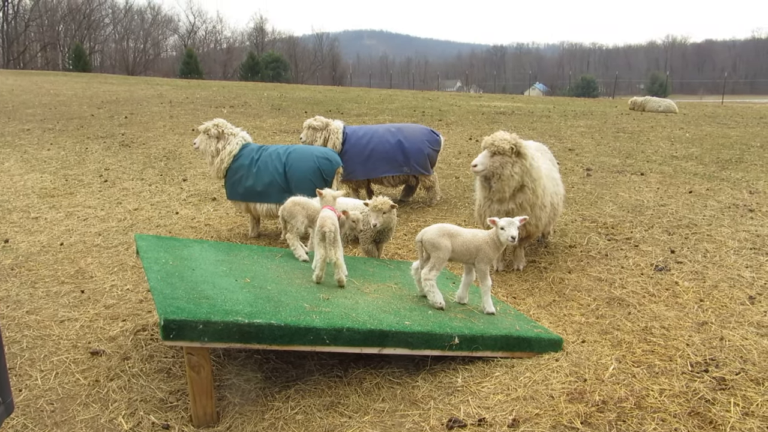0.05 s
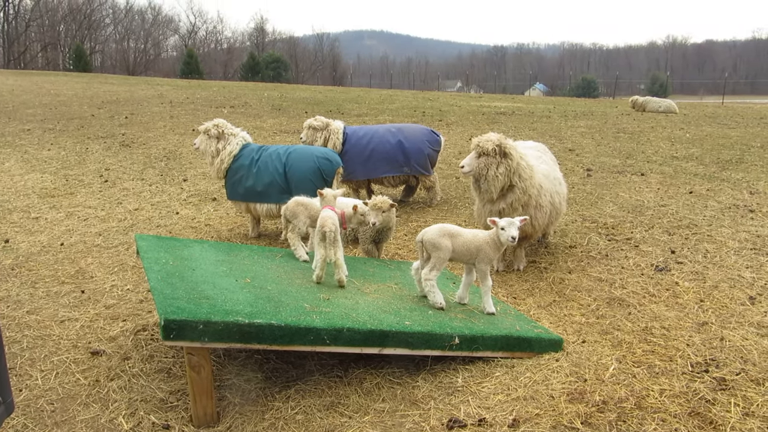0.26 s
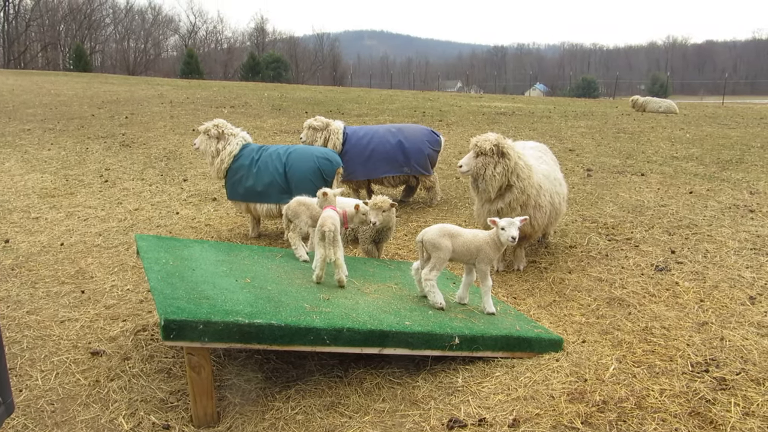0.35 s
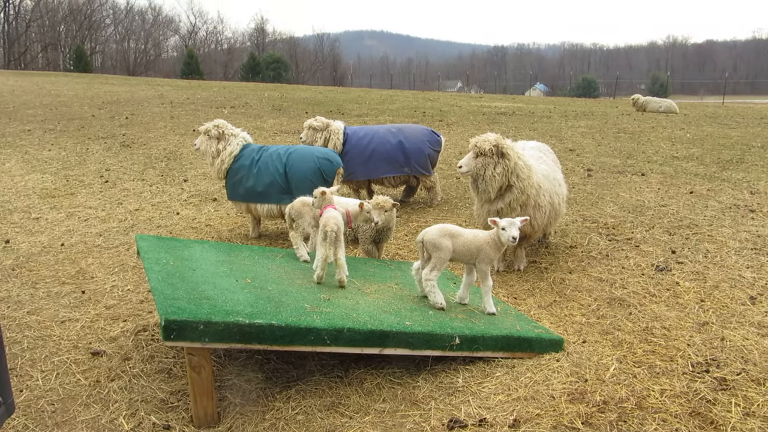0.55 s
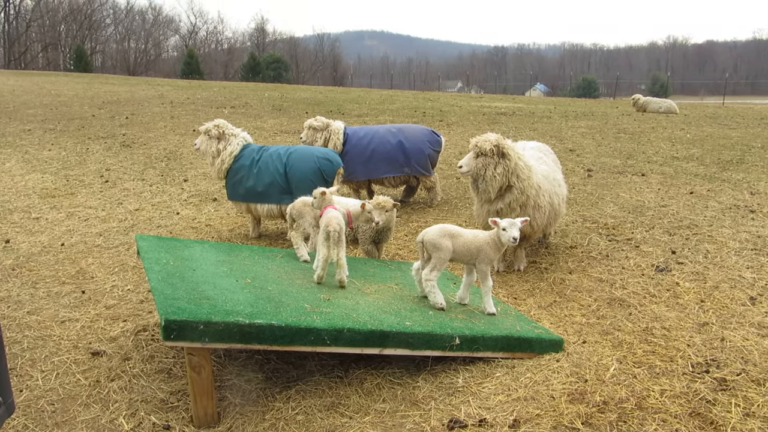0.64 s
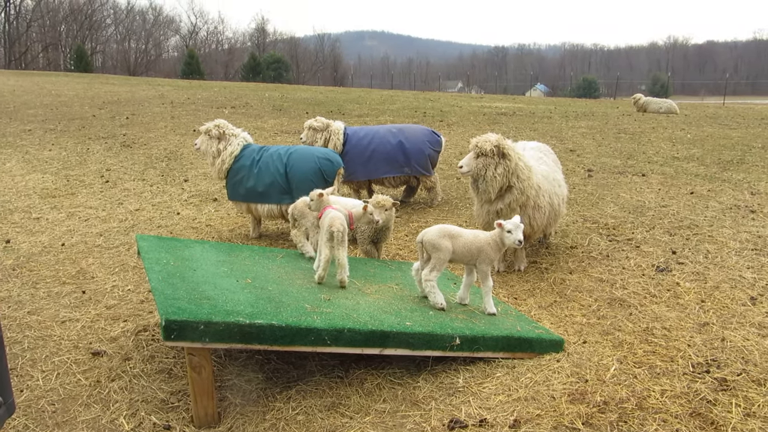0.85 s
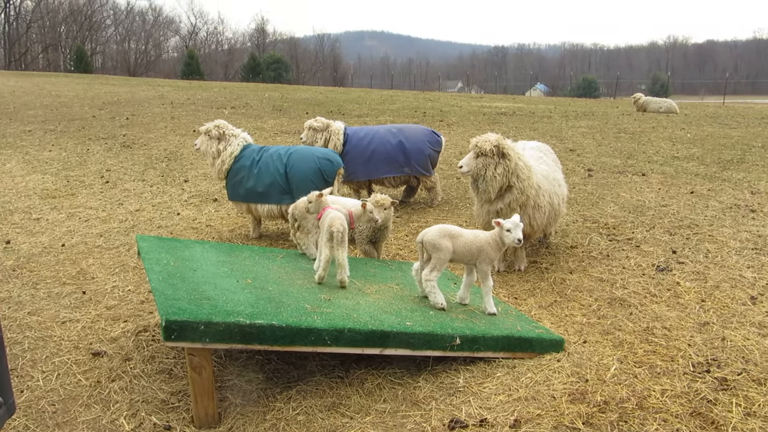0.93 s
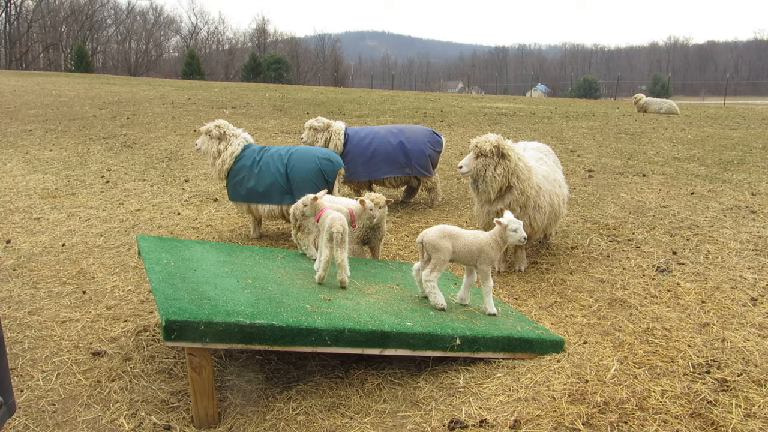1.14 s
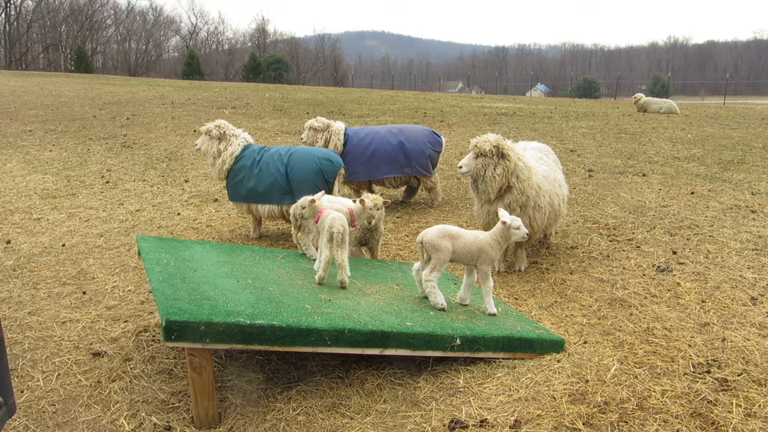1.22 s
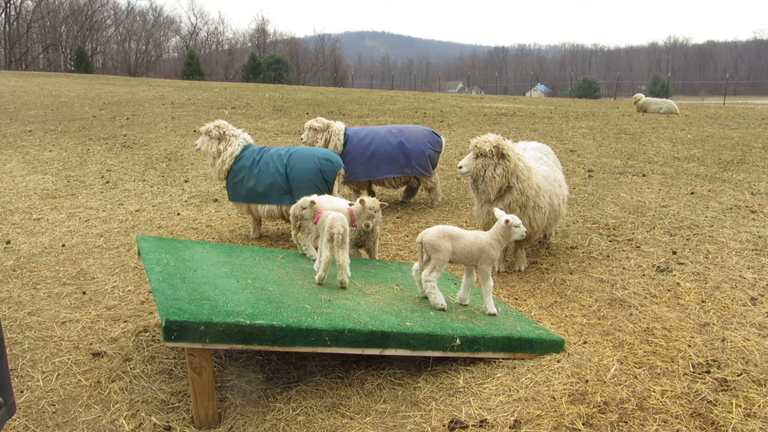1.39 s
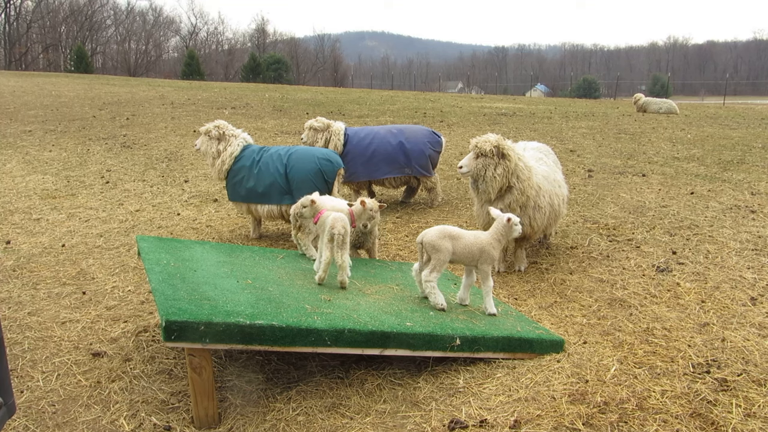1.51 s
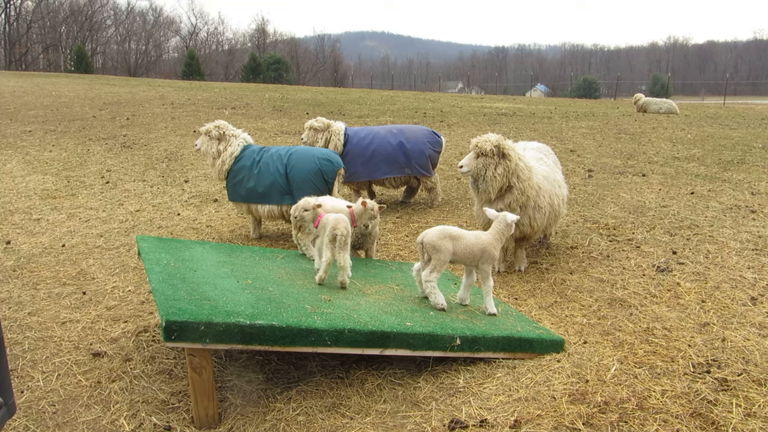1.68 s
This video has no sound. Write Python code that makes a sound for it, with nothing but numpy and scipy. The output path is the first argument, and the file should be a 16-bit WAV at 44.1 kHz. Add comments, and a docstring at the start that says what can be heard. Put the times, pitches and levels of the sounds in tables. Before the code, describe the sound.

One loud, steady, reedy lamb bleat, close to the microphone and toward the left, with a faint echo from across an open field; soft hoof taps and straw scuffs follow over low outdoor hiss.

```python
"""Open field: a lamb close by gives one loud bleat; hooves knock on a carpeted wooden ramp and scuff in straw.
Bleat: harmonics of the fold rate plus pulsed noise, coloured by a mouth that opens, stays wide, half closes.
A short rough catch leads to a held note that sags and frays; a far tree line answers faintly.
Hooves: damped sines with taps and noise clicks; scuffs are crackling noise bursts; the ramp sways once.
Background: quiet outdoor air as coloured stereo noise, with a faint far tone at the start."""
import sys
import numpy as np
from scipy import signal
from scipy.fft import rfft, irfft, next_fast_len
from scipy.io import wavfile
from scipy.ndimage import map_coordinates

SR = 44100
rng = np.random.default_rng(int(sys.argv[2]) if len(sys.argv) > 2 else 0)


def wrap_up_sound(samples):
    """Save the sound to the file named by the first command line argument, as 16-bit audio."""
    columns = np.atleast_2d(samples).T
    # keep every value between -1 and 1, then stretch to whole-number steps
    tamed = np.clip(columns, -1, 1)
    steps = np.round(tamed * 32767).astype(np.int16)
    wavfile.write(sys.argv[1], SR, steps)


N = 77175

# Vocal fold rate before jitter [t/s, f/Hz]
FOLD_RATE = [(.15, 312.3), (.176, 353.6), (.188, 351), (.203, 326.7), (.218, 379.3), (.235, 385.4),
             (.258, 393), (.272, 390.6), (.311, 402.7), (.4, 403.4), (.46, 405.3), (.53, 408.2),
             (.595, 406.3), (.68, 406.8), (.735, 409.3), (.81, 405.5), (.85, 406.1), (.915, 408),
             (1.03, 402.3), (1.055, 406.7), (1.138, 400.7), (1.162, 389), (1.179, 349), (1.2, 332.7)]
# Voice level before shimmer [t/s, level/dB]
VOICE_LEVEL = [(.14, -63), (.163, -36), (.178, -28.5), (.2, -40), (.214, -38.5), (.235, -26), (.258, -21),
               (.28, -22), (.32, -21), (.46, -21), (.56, -19.5), (.82, -19), (1.01, -21), (1.05, -24.5),
               (1.085, -25.5), (1.158, -31.5), (1.184, -41), (1.212, -69)]
# Hoarseness: noise against tone [t/s, ratio/dB]
RASP = [(.15, -11), (.178, -17.5), (.205, -12), (.232, -27), (.313, -28), (.38, -44), (.6, -44), (.66, -36),
        (1.135, -33), (1.153, -14), (1.175, -7)]
# Throat and mouth colour per position, before power scaling [harmonic of that position's pitch, level/dB]
CATCH = [(1, -19), (2, -7.5), (3, -15), (4, 1), (5, -4.5), (6, -11), (7, -26), (8, -20), (9, -17),
         (10, 1.5), (11, -14), (12, -37), (13, -3), (14, -3.5), (15, -9), (16, -1.5), (17, -16), (18, -12),
         (19, -7), (20, -12), (21, -11), (22, -21), (30, -40)]
OPENING = [(1, -21), (2, -4.5), (3, 1), (4, -1), (5, -6), (6, -18.5), (7, -13.5), (8, -10), (9, -2),
           (10, -10.5), (11, -1), (12, -6), (13, -9), (14, -1.5), (15, -6.5), (16, -12), (18, -11),
           (20, -18), (21, -18), (22, -22), (23, -41)]
WIDE = [(1, -21.5), (2, -6.5), (3, 0.5), (4, 0.5), (5, -11.5), (6, -27.5), (7, -11.5), (8, -9), (9, -21.5),
        (10, -14), (11, -17.5), (12, -11.5), (13, -13.5), (15, -11), (16, -13.5), (17, -13.5), (18, -18),
        (19, -19.5), (20, -23.5), (23, -27), (24, -34.5), (25, -29.5), (26, -27.5), (27, -40), (28, -30),
        (29, -40.5), (31, -45), (32, -52)]
CLOSING = [(1, -22.5), (2, -4), (3, -1.5), (4, 2.5), (5, -13.5), (6, -22.5), (7, -10), (8, -10), (9, -14),
           (10, -8), (11, -17), (12, -10.5), (14, -11), (15, -20), (16, -21), (17, -27), (18, -25),
           (19, -30), (20, -46), (21, -29), (22, -36), (24, -52), (25, -28), (26, -42)]
# Moves to the next mouth position [t centre/s, duration/s]
MOUTH_MOVES = [(.212, 0.028), (.297, 0.042), (1.032, 0.036)]
# Harmonics swell and drop out singly [f/Hz, swing depth]
WAVER_DEPTH = [(1600, .02), (2400, .2), (3000, .12), (4300, .25), (6000, .16), (10000, .28)]
# Two bands drift in strength as the note is held [t/s, lower band gain/dB, upper band gain/dB]
BAND_DRIFT = [(.3, -1, -2), (.6, 6, 2.5), (.75, -5, 2), (.97, -8.5, -2.5), (1.06, 0.5, -1.5)]
# Bursts of strained air before fold gating [t/s, half length/s, f/Hz, level/dB]
STRAINS = [(.18, .014, 5100, -41), (.248, .03, 5900, -46.5), (.312, .026, 4600, -40)]
# Rasp colour [f/Hz, level/dB]
RASP_COLOUR = [(250, -10), (800, 0), (1500, 0), (2500, -12), (3400, -3), (4700, 3), (7000, -7), (9000, -20),
               (15000, -50)]
# Voice, left over right [f/Hz, level/dB]
VOICE_LEFT_GAIN = [(400, 7.5), (800, 3.5), (1300, 3), (2400, 0), (4400, 3), (8000, 2), (14000, -2)]
# Voice, left minus right [f/Hz, phase/rad]
VOICE_LEFT_PHASE = [(400, -1.85), (1100, -0.81), (3200, -0.54), (9000, -1.14)]
# Hoof knocks [t/s, thump level/dB, f/Hz, t60/s, click level/dB]
KNOCKS = [(.812, -33, 125, 0.086, -56), (.826, -35, 163, 0.086, -54), (1.036, -38, 154, 0.055, -58),
          (1.303, -34.5, 698.7, 0.015, -67), (1.449, -41.5, 331, 0.054, -46.5),
          (1.483, -36.5, 334, 0.047, -59), (1.49, -47.5, 151, 0.12, -64), (1.622, -41.5, 156.3, 0.059, -57),
          (1.658, -28, 364.5, 0.032, -37.5), (1.682, -54, 380, 0.018, -43.5)]
# Scuffs in straw [t/s, length/s, level/dB]
SCUFFS = [(0.809, 0.054, -38.5), (1.415, 0.08, -55), (1.621, 0.039, -48), (1.664, 0.033, -48.5)]
# Straw noise colour [f/Hz, level/dB]
STRAW_COLOUR = [(100, 6), (400, 7.5), (1000, 0), (2000, -1.5), (4000, -5), (7000, -10.5), (14000, -49)]
# Hoof click colour [f/Hz, level/dB]
CLICK_COLOUR = [(100, -17), (500, -20), (2000, 0), (3500, -21), (14000, -45)]
# Steps, left minus right [f/Hz, phase/rad]
STEP_LEFT_PHASE = [(300, -1.75), (900, -.3)]
# Far echo decay [f/Hz, t60/s]
FIELD_T60 = [(200, 0.48), (1500, 1.075), (4000, 2.03), (10000, 0.15)]
# Outdoor air colour [f/Hz, level/dB]
AIR_COLOUR = [(15, -48), (25, -16), (82, -9), (495, -16.5), (804, -11.5), (1800, -16), (3090, -20),
              (15500, -33.5)]
# Likeness of the air in both ears before panning [f/Hz, coherence]
AIR_COHERENCE = [(300, 0.081), (1500, 0.081), (12000, 0.022)]
# Faint far tone [t/s, f/Hz]
TONE_PITCH = [(0, 511), (.08, 488), (.15, 523), (.26, 550)]

CATCH_HZ, OPENING_HZ, WIDE_HZ, CLOSING_HZ = 352, 391, 407, 403
RISE_DB_PER_HARMONIC = 1.5  # beyond the last harmonic listed
# Bright resonance around the move to wide; gain is scaled by that move's progress
RING_HZ, RING_WIDTH_HZ, RING_SCALE_DB, RING_HALF_LENGTH_S = 4500, 1370, 6.5, .14
LOWER_BAND_HZ, UPPER_BAND_HZ, BAND_WIDTH_HZ = 2373, 3400, 260
WAVERS_PER_S = 20
FLUTTER_HZ, FLUTTER_WIDTH_HZ, FLUTTER_DEPTH, FLUTTERS_PER_S = 4250, 1050, .48, 62
JITTER, JITTER_PER_RASP = .0007, .035  # relative pitch, per unit wobble
SHIMMER_DB, UNEVEN_DB_PER_RASP = .08, 3  # level, per unit wobble
SMEAR_S_PER_KHZ = .00008  # higher harmonics arrive later
STRAIN_WIDTH_HZ = 900
TAP_HZ, TAP_T60_S, TAP_OVER_CLICK_DB = 1800, .005, 7
SWAY_START_S, SWAY_HZ, SWAY_DB, SWAY_T60_S = .845, 41.95, -42, .43
STEP_LEFT_DB, STEP_ECHO_DB = 8, -11
GROUND_DB, GROUND_HZ, GROUND_T60_S = -19, 2500, .015
NEAR_DB, NEAR_T60_S, FIELD_DB = -21, .28, -24.5
AIR_DB, AIR_LEFT_DB = -51, 2.5
TONE_DB, TONE_ENDS_S, TONE_FADE_S = -58, .24, .074
TOP_HZ = 15750


def amp(db):
    """Decibels to gain."""
    return 10 ** (np.asarray(db) / 20)


def unit(x):
    """Scale to rms 1."""
    return x / np.sqrt(np.mean(x ** 2) + 1e-20)


def clock():
    """Time of each sample in s."""
    return np.arange(N) / SR


def along(points, hz):
    """Interpolate (Hz, value) points on a log axis."""
    f, v = np.transpose(points)
    return np.interp(np.log(hz + 1), np.log(f + 1), v)


def curve(points):
    """Join (s, value) points by lines."""
    return np.interp(clock(), *np.transpose(points))


def wobble(rate):
    """Smooth random curve, rate knots per s."""
    coarse = clock()[::16]
    knots = rng.standard_normal(int(N * rate / SR) + 4)
    return np.interp(clock(), coarse, map_coordinates(knots, [coarse * rate]))


def filtered(x, response):
    """x times a response of frequency."""
    m = next_fast_len(N + SR // 2)
    return irfft(rfft(x, m) * response(np.fft.rfftfreq(m, 1 / SR)), m)[..., :N]


def noise(colour):
    """Coloured noise of rms 1."""
    return unit(filtered(rng.standard_normal(N), lambda hz: amp(along(colour, hz))))


def bell(x, centre, width):
    """Gaussian of height 1, down to 1/e at centre +- width."""
    return np.exp(-((x - centre) / width) ** 2)


def waver(depth, rate):
    """Random swings of strength and phase at constant expected power."""
    swing = wobble(rate) + 1j * wobble(rate)
    return (1 + depth * swing) / np.sqrt(1 + 2 * depth ** 2)


def pan(left_db):
    """Left and right gains, left over right by left_db."""
    return amp(np.array([[.5], [-.5]]) * left_db)


def phase_split(points, hz):
    """Left and right phase turns from (Hz, left minus right in rad) points."""
    return np.exp(1j * np.array([[.5], [-.5]]) * along(points, hz))


def dying(start_s, t60_s, rise_s):
    """Quick rise and exponential decay."""
    age = np.maximum(clock() - start_s, 0)
    return (1 - np.exp(-age / rise_s)) * amp(-60 * age / t60_s)


def throat(shape, pitch_hz):
    """Frequencies and minimum-phase log response of one position, unit power over the listed harmonics."""
    order, listed_db = np.transpose(shape)
    hz = np.fft.rfftfreq(2048, 1 / SR)
    harmonic = hz / pitch_hz
    db = np.interp(harmonic, order, listed_db)
    db += RISE_DB_PER_HARMONIC * np.maximum(harmonic - order[-1], 0)
    db -= 10 * np.log10(np.sum(amp(listed_db) ** 2))
    # folding the cepstrum makes the response causal
    cepstrum = irfft(np.log(amp(db)))
    cepstrum[1:len(hz) - 1] *= 2
    cepstrum[len(hz):] = 0
    return hz, rfft(cepstrum)


def bleat():
    """Fold pulses ring the moving throat; hoarseness shakes their rate and adds a noise puff to each."""
    t, rasp = clock(), amp(curve(RASP))
    jitter = JITTER * wobble(71.3) + JITTER_PER_RASP * rasp * wobble(450)
    pitch = curve(FOLD_RATE) * (1 + jitter)
    phase = 2 * np.pi * np.cumsum(pitch) / SR

    begun, opened, closed = [np.clip((t - s) / takes + .5, 0, 1) for s, takes in MOUTH_MOVES]
    mouths = [(1 - begun, throat(CATCH, CATCH_HZ)),
              (begun - opened, throat(OPENING, OPENING_HZ)),
              (opened - closed, throat(WIDE, WIDE_HZ)),
              (closed, throat(CLOSING, CLOSING_HZ))]
    ring_db = RING_SCALE_DB * opened * bell(t, MOUTH_MOVES[1][0], RING_HALF_LENGTH_S)
    lower_db, upper_db = [curve(np.array(BAND_DRIFT)[:, [0, column]]) for column in (1, 2)]

    tone = np.zeros(N)
    for k in range(1, 33):
        hz = k * pitch
        response = sum(share * np.interp(hz, *mouth) for share, mouth in mouths)
        gain_db = ring_db * bell(hz, RING_HZ, RING_WIDTH_HZ)
        gain_db += lower_db * bell(hz, LOWER_BAND_HZ, BAND_WIDTH_HZ)
        gain_db += upper_db * bell(hz, UPPER_BAND_HZ, BAND_WIDTH_HZ)
        gain = amp(gain_db) * waver(along(WAVER_DEPTH, k * WIDE_HZ), WAVERS_PER_S)
        # upper middle harmonics also flutter quickly
        gain = gain * waver(FLUTTER_DEPTH * bell(hz, FLUTTER_HZ, FLUTTER_WIDTH_HZ), FLUTTERS_PER_S)
        smear = np.pi * SMEAR_S_PER_KHZ * (hz / 1000) * hz
        tone += np.sqrt(2) * np.real(gain * np.exp(response + 1j * (k * phase - smear)))

    gate = 1 + .55 * np.cos(phase - 1)
    puffs = unit(noise(RASP_COLOUR) * gate)
    uneven_db = (SHIMMER_DB + UNEVEN_DB_PER_RASP * rasp) * wobble(300)
    effort = amp(curve(VOICE_LEVEL) + uneven_db)
    voice = (tone + rasp * puffs) / np.sqrt(1 + rasp ** 2)
    return effort * voice + gate * strain()


def strain():
    """As the voice starts, rushing air briefly excites the upper mouth resonances."""
    out = np.zeros(N)
    for s, half_length, centre, db in STRAINS:
        rush = unit(filtered(rng.standard_normal(N), lambda hz: bell(hz, centre, STRAIN_WIDTH_HZ)))
        out += amp(db) * bell(clock(), s, half_length) * rush
    return out


def hooves():
    """Knocks are damped thumps with hard taps and clicks; scuffs crackle in straw; the ramp sways once."""
    t, out = clock(), np.zeros(N)
    click = noise(CLICK_COLOUR)
    straw = unit(noise(STRAW_COLOUR) * amp(1.0 * wobble(500)))
    for s, db, hz, t60, click_db in KNOCKS:
        out += amp(db) * dying(s, t60, rise_s=.002) * np.sin(2 * np.pi * hz * (t - s))
        tap = dying(s, TAP_T60_S, rise_s=.0002) * np.sin(2 * np.pi * TAP_HZ * (t - s))
        burst = dying(s, t60_s=.027, rise_s=.00036) * click
        out += amp(click_db) * (amp(TAP_OVER_CLICK_DB) * tap + burst)
    for s, length, db in SCUFFS:
        onset = np.clip((t - s) / .0081, 0, 1)
        out += amp(db) * onset * bell(t, s, length) * straw
    sway = np.sin(2 * np.pi * SWAY_HZ * (t - SWAY_START_S))
    return out + amp(SWAY_DB) * dying(SWAY_START_S, SWAY_T60_S, rise_s=.01) * sway


def echo(x, t60_s):
    """Scattered sound as decaying noise, different in each ear; t60_s maps Hz to decay time."""
    hz, t, z = signal.stft(rng.standard_normal((2, SR)), SR, nperseg=256)
    tail = signal.istft(z * amp(-60 * t / t60_s(hz[:, None])), SR, nperseg=256)[1]
    return signal.fftconvolve(x[None], tail / np.linalg.norm(tail[0]), axes=1)[:, :N]


def air():
    """Quiet outdoor air: mid and side noise set the coherence; a faint tone soon fades."""
    def angle(hz):
        """Mid-side mixing angle in rad."""
        return np.arccos(np.clip(along(AIR_COHERENCE, hz), -1, 1)) / 2

    mid = filtered(noise(AIR_COLOUR), lambda hz: np.cos(angle(hz)))
    side = filtered(noise(AIR_COLOUR), lambda hz: np.sin(angle(hz)))
    hiss = amp(AIR_DB + .15 * wobble(6.62)) * np.array([mid + side, mid - side])
    fade = np.clip((TONE_ENDS_S - clock()) / TONE_FADE_S, 0, 1)
    tone = np.sin(2 * np.pi * np.cumsum(curve(TONE_PITCH)) / SR) * fade
    return pan(AIR_LEFT_DB) * (hiss + amp(TONE_DB) * tone)


def scene():
    """Lamb and hooves toward the left, with ground scatter, near and far echoes and air."""
    voice, steps = bleat(), hooves()
    direct = filtered(voice, lambda hz: pan(along(VOICE_LEFT_GAIN, hz)) * phase_split(VOICE_LEFT_PHASE, hz))
    ramp = filtered(steps, lambda hz: pan(STEP_LEFT_DB) * phase_split(STEP_LEFT_PHASE, hz))
    # straw scatters the treble
    treble = filtered(voice, lambda hz: hz ** 2 / (hz ** 2 + GROUND_HZ ** 2))
    ground = amp(GROUND_DB) * echo(treble, lambda hz: GROUND_T60_S)
    near = echo(amp(NEAR_DB) * treble + amp(STEP_ECHO_DB) * steps, lambda hz: NEAR_T60_S)
    far = amp(FIELD_DB) * echo(voice, lambda hz: along(FIELD_T60, hz))
    return direct + ground + ramp + near + far + air()


def record(dry):
    """Remove everything from TOP_HZ up."""
    return filtered(dry, lambda hz: hz < TOP_HZ)


dry = scene()
out = record(dry)
wrap_up_sound(out)
```